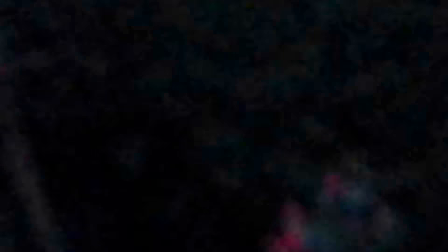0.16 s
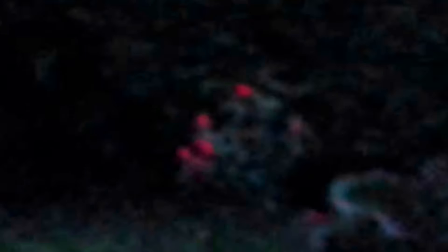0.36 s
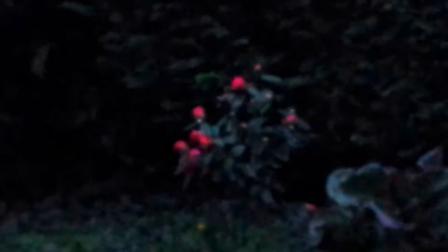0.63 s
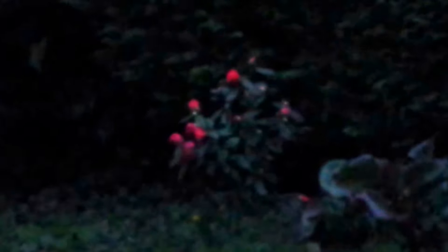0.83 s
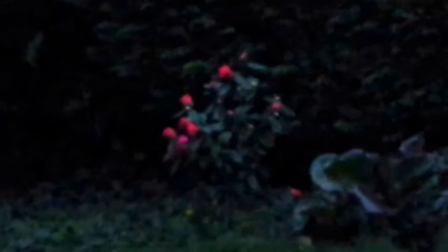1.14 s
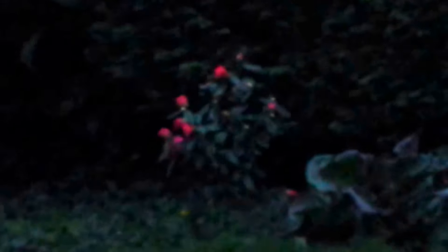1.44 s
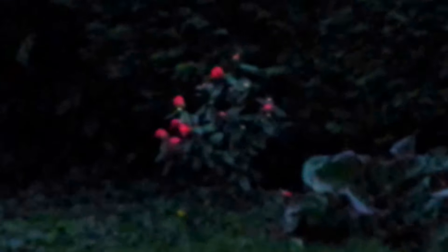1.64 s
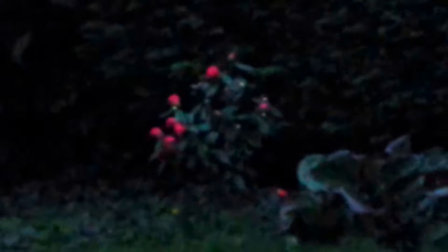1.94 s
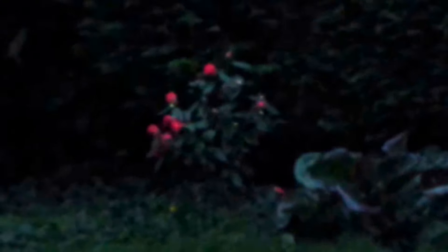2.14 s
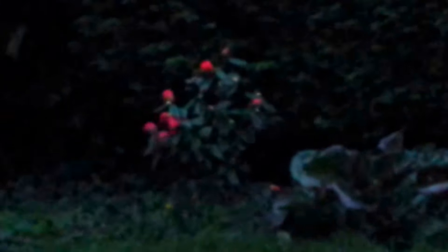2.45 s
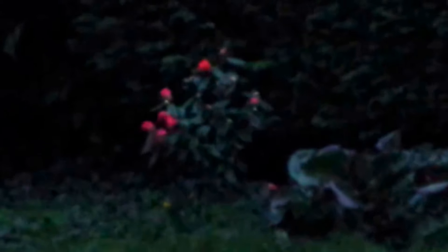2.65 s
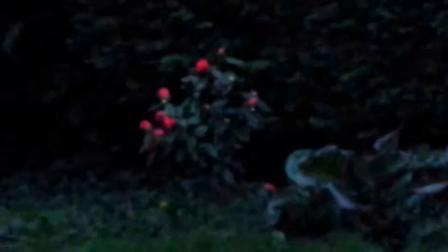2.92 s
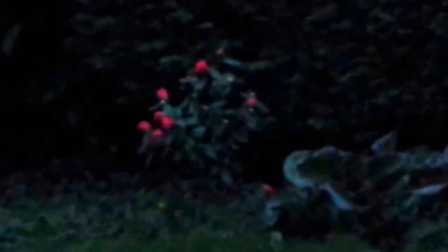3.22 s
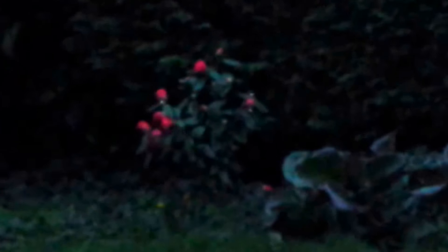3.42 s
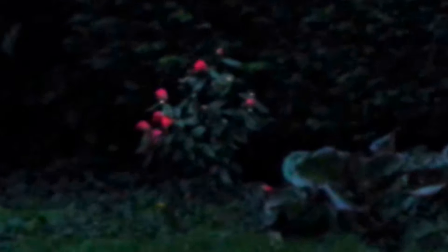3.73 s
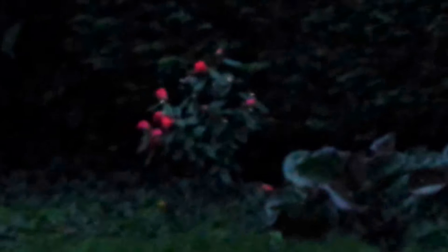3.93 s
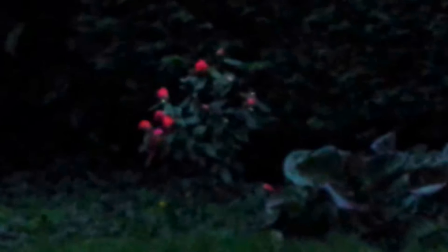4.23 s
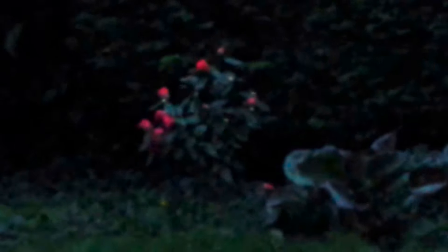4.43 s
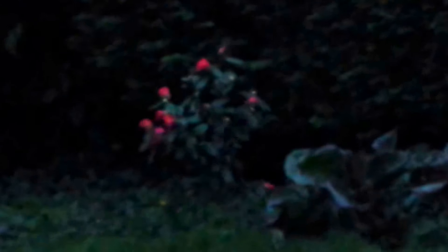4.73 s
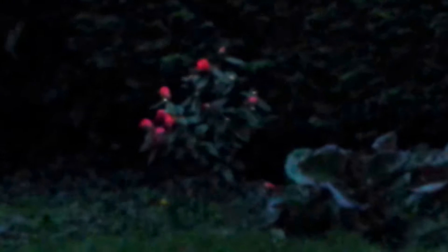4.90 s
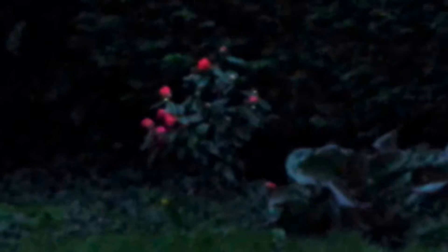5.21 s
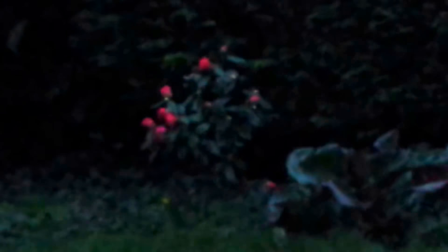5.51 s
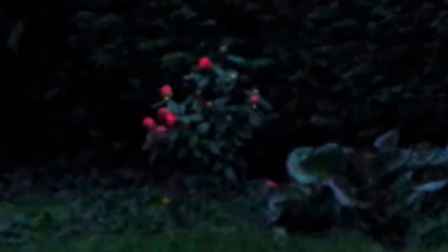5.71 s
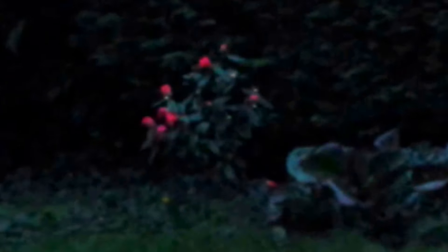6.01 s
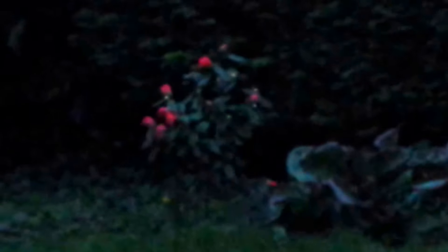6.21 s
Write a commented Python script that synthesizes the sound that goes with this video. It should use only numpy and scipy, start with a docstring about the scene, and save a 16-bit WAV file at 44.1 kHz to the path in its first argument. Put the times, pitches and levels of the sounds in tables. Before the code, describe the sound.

Quiet outdoor air with faint low rumble, hiss and a wavering far machine hum. At about 0.6 s two tiny sharp bill clicks sound, with a barely audible distant call. From 0.9 to 1.25 s a starling gives a raspy trill, a bright warbling trill and quick whistles, then nasal chatter sagging into rattles until 1.65 s. A buzz and whistle lead to two shrill, shivering squeaks at 1.8-1.95 s. After a gap, trills and a steady whistle run from 2.2 to 2.55 s, followed by two very high zips with harsh snaps, a high trill, and thin falling slurs ending near 2.9 s. A long subdued pause follows, with a low rush at 3.6 s and a distant hoarse call at 5.04 s. From 5.45 s whistles, reedy buzzes and warbling trills resume until the end at about 6.36 s, while a low motor hum rises. The bird is slightly right, with short garden echoes.

```python
"""Starling song in a garden

A starling sings in bouts: whistles, trills, nasal chatter, rattles, buzzes, squeaks, very high zips and slurs.
Each note is a sum of harmonics on a gliding pitch plus noise that follows its strength, filtered by the throat;
clicks are noise bursts. Discrete echoes and random reflections stand for ground, leaves and hedge. Behind lie
coloured-noise rumble, wash and hiss, wavering machine tones and two distant short calls made of shaped noise.
The recorder's noise suppressor lowers the quiet passages between the bouts."""
import sys
import numpy as np
from scipy import signal
from scipy.fft import rfft, irfft
from scipy.io import wavfile
from scipy.ndimage import uniform_filter1d

SR = 44100
rng = np.random.default_rng(int(sys.argv[2]) if len(sys.argv) > 2 else 0)


def to_wav(s):
    """Save 16-bit WAV."""
    ch = np.atleast_2d(s).T  # columns
    pcm = np.round(np.clip(ch, -1, 1) * 32767)  # PCM
    wavfile.write(sys.argv[1], SR, pcm.astype(np.int16))


N = 280476
TIME, FREQS = np.arange(N) / SR, np.fft.rfftfreq(N, 1 / SR)  # s, Hz
SOFT_ENDS = signal.windows.tukey(N, .0015)  # short fades before whole-length filtering


def amp(db):
    """Decibel law: 20 dB is a factor of ten in amplitude."""
    return 10 ** (np.asarray(db) / 20)


def evened(x):
    """Normalization to unit root-mean-square amplitude."""
    return x / np.sqrt(np.mean(x ** 2) + 1e-20)


def read(points, hz):
    """Interpolation along a logarithmic frequency axis."""
    f, value = np.transpose(points)
    return np.interp(np.log(hz + 1), np.log(f + 1), value)


def add(mix, start_s, sound):
    """Superposition: a sound adds to the mix from its start time."""
    part = mix[round(start_s * SR):][:len(sound)]
    part += sound[:len(part)]


def wander(size, hz):
    """Low-pass random fluctuation of rms 1, mostly slower than hz."""
    f = np.fft.rfftfreq(size, 1 / SR)
    return evened(irfft(rfft(rng.standard_normal(size)) / (1 + (f / hz) ** 2), size))


# Left-right correlation of diffuse noise: frequency [Hz], correlation [-1 to 1]
NOISE_CORRELATION = [(60, 0.93), (150, 0.87), (380, 0.986), (950, 0.69), (2380, -0.083), (5980, -0.11),
                     (15000, -0.33)]


def noise(spectrum):
    """Diffuse field: coloured noise of rms 1 at two microphones, correlated in the bass."""
    a, b = rfft(rng.standard_normal((2, N)))
    same = np.clip(read(NOISE_CORRELATION, FREQS), -1, 1)
    pair = np.array([a, same * a + np.sqrt(1 - same ** 2) * b])
    return evened(irfft(pair * amp(read(spectrum, FREQS)), N))


# Relative spectra of outdoor rumble, mid-range wash, hiss and low rush: frequency [Hz], density [dB per Hz]
RUMBLE_SPECTRUM = [(15, -49), (25, -16.5), (32, -21), (60, -17.5), (81, -10.5), (102, -11), (120, -8),
                   (167, -8), (291, 1.5), (375, -1), (432, -4), (584, -7), (695, -3), (867, -12),
                   (1100, -25.5), (1430, -40.5), (2420, -120)]
WASH_SPECTRUM = [(700, -21.5), (1000, -3), (1300, 0), (1700, -1), (2300, 0.5), (2800, -10.5), (4500, -10.5),
                 (8000, -16.5)]
HISS_SPECTRUM = [(1760, -33), (3000, 1.5), (3170, 1), (5110, -16), (8640, -7.5), (11800, -2), (13600, 3.5),
                 (15600, -9.5), (16000, -10.5)]
RUSH_SPECTRUM = [(70, -46), (200, -15.5), (300, 1.5), (400, -2), (520, -8), (690, 2.5), (900, -18.5),
                 (1500, -40.5)]
# Swells of low rushing noise: centre_s [s], half_width_s [s, to 1/e], level_db [dB]
RUSH_SWELLS = [(1.151, 0.096, -46), (3.62, 0.13, -47.5)]
RUMBLE_DB, WASH_DB, HISS_DB = -52.5, -58, -61  # rumble and wash at the start; hiss throughout
DRIFT_DB_PER_S = 0.5383  # slow rise of rumble and wash


def background():
    """Broadband ambient noise: rumble and wash rise over a steady hiss, and a low rush swells twice."""
    drift_db = DRIFT_DB_PER_S * TIME
    rumble = amp(RUMBLE_DB + drift_db) * noise(RUMBLE_SPECTRUM)
    wash = amp(WASH_DB + drift_db) * noise(WASH_SPECTRUM)
    hiss = amp(HISS_DB) * noise(HISS_SPECTRUM)
    swells = sum(amp(db) * np.exp(-((TIME - s) / width) ** 2) for s, width, db in RUSH_SWELLS)
    return rumble + wash + hiss + swells * noise(RUSH_SPECTRUM)


def tones(lines, waver_hz):
    """Frequency modulation: sine tones waver independently in pitch by waver_hz rms."""
    total = np.zeros(N)
    for hz, db in lines:
        phase = 2 * np.pi * np.cumsum(hz + waver_hz * wander(N, 3)) / SR
        total += amp(db) * np.sqrt(2) * np.sin(phase)
    return total


# Steady far machinery: pitch_hz [Hz], level_db [dB, before a common lift]
DRONE_LINES = [(140.0, -71), (301.5, -71), (678.3, -75.5), (936.7, -73.5), (1254, -75)]
# Harmonics of a far motor: pitch_hz [Hz], level_db [dB, relative to the motor level]
MOTOR_LINES = [(113, -6), (226, -10.5)]
# Motor level over time: time_s [s], level_db [dB]
MOTOR_LEVEL = [(0, -68.5), (4.7, -71), (5.3, -56), (5.7, -53.5), (6.36, -52)]


def machines():
    """Line spectra: a steady drone and a motor hum whose level follows its own curve."""
    drone = amp(2.5) * tones(DRONE_LINES, waver_hz=2.5)
    motor_level = amp(np.interp(TIME, *np.transpose(MOTOR_LEVEL)))
    return drone + motor_level * tones(MOTOR_LINES, waver_hz=1.5)


# Bill clicks and harsh snaps: start_s [s], level_db [dB, before the high-pass], decay_s [s, to 1/e], edge_hz [Hz]
BILL_CLICKS = [(0.6263, -31.5, 0.00072, 9700), (0.633, -23.5, 0.00085, 10260), (0.935, -47.5, 0.0145, 3587),
               (1.026, -42, 0.0156, 3970), (1.862, -27.5, 0.0152, 8280), (2.581, -25.5, 0.011, 5010),
               (2.626, -24.5, 0.0071, 4973), (5.773, -38, 0.0056, 4000)]


def clicks():
    """Impulsive excitation: exponentially decaying noise bursts, high-passed to the treble."""
    t, out = TIME[:SR // 20], np.zeros(N)
    for start_s, db, decay_s, edge_hz in BILL_CLICKS:
        high_pass = signal.butter(3, edge_hz, "high", fs=SR, output="sos")
        burst = amp(db) * np.exp(-t / decay_s) * rng.standard_normal(len(t))
        add(out, start_s, signal.sosfilt(high_pass, burst))
    return out


# Distant short calls: start_s [s], level_db [dB]
DISTANT_CALLS = [(.68, -59), (5.039, -38.5)]
# Their relative spectrum: frequency [Hz], density [dB per Hz]
DISTANT_SPECTRUM = [(500, -32.5), (950, -21), (1200, -6), (1400, 5.5), (1580, -12), (1800, -12.5),
                    (2900, -30.5), (3450, -24.5), (3750, -13), (4400, -25), (7000, -27.5), (14000, -35)]


def far_calls(rise_s=0.0242, tail_db=-11, tail_t60=1.0):
    """Reverberant decay: a hoarse noise syllable swells and dies, and the gardens echo it."""
    level = np.zeros(N)
    for start_s, db in DISTANT_CALLS:
        elapsed = np.maximum(TIME - start_s, 0)
        u = elapsed / rise_s
        syllable = (u * np.exp(1 - u)) ** 2
        tail = amp(tail_db - 60 * elapsed / tail_t60) * np.tanh(10 * u)
        level += amp(db) * np.hypot(syllable, tail)  # the two add in energy
    return level * noise(DISTANT_SPECTRUM)


BLOOM_S, WARBLE_WANDER = 0.011, 0.016  # time for a warble to widen; random share by which its rate varies
WARBLE_SNAP, JUMP_DIP = 3.5, .55  # abruptness of warble jumps; largest share of strength lost in a jump


def syrinx(tone, hz, db, rasp=0., swing_hz=0., rate_hz=0., *, jitter, throb, second_db):
    """Self-sustained oscillation: a membrane's harmonics glide, warble and tremble; throb lifts warble crests."""
    t = TIME[:len(hz)]
    cycles = np.cumsum(rate_hz * (1 + WARBLE_WANDER * wander(len(t), 87))) / SR
    flip = -np.tanh(WARBLE_SNAP * np.sin(2 * np.pi * cycles))  # lingers at top and bottom
    bloom = np.tanh(t / BLOOM_S)
    tremble = jitter * wander(len(t), 120) + .06 * rasp * wander(len(t), 800)
    pitch = (hz + swing_hz * bloom * flip) * (1 + tremble)
    phase = 2 * np.pi * np.cumsum(pitch) / SR
    tension_db = second_db * np.log2(pitch / 5000)  # a tighter membrane strengthens the second harmonic
    wave = np.zeros(len(t))
    for k, level_db in enumerate(tone, 1):
        audible = k * pitch < SR / 2  # no aliasing
        wave += amp(level_db + (k == 2) * tension_db) * np.sin(k * phase) * audible
    depth = bloom * np.tanh(20 * swing_hz / hz)
    flutter = np.exp(throb * depth * flip + rasp * wander(len(t), 800) / 2)
    jump_loss = 1 - JUMP_DIP * depth * (1 - flip ** 2)
    return amp(db) * evened(wave * flutter * jump_loss)


# Relative spectrum of air rushing through the open bill: frequency [Hz], density [dB per Hz]
BILL_AIR = [(2000, -42.5), (3200, -4.5), (5000, -1.5), (7300, 4.5), (10000, -6), (12500, -3.5), (15500, -2)]


def phrase(notes, gesture, tone, gain_db, noise_db, attack_s, release_s, jitter,
           throb=0., second_db=0., noise_spectrum=BILL_AIR):
    """Envelope following: gated notes of one voice carry coloured noise that follows their strength."""
    out = np.zeros(N)
    for start_s, length_s, *shape in notes:
        t = np.arange(0, length_s, 1 / SR)
        ramp = np.clip(np.minimum(t / attack_s, (length_s - t) / release_s), 0, 1)
        gate = np.sin(np.pi / 2 * ramp) ** 2
        note = syrinx(tone, *gesture(t, *shape), jitter=jitter, throb=throb, second_db=second_db)
        add(out, start_s, gate * note)
    strength = np.sqrt(abs(uniform_filter1d(out ** 2, size=160)))
    return amp(gain_db) * (out + amp(noise_db) * strength * noise(noise_spectrum)[0])


def arch(t, turn_s, first_hz, turn_hz, last_hz, bend=1.6):
    """Power-law glide: pitch eases into a turning point and curves away (bend 2 is a parabola)."""
    before = np.maximum(1 - t / turn_s, 0)
    after = np.maximum(t - turn_s, 0) / max(t[-1] - turn_s, 1 / SR)
    return turn_hz + (first_hz - turn_hz) * before ** bend + (last_hz - turn_hz) * after ** bend


def swell(t, db, swell_db):
    """Exponential envelope: level changes linearly in decibels through a note."""
    return db + swell_db * (t / t[-1] - .5)


def arched(t, turn_s, first_hz, turn_hz, last_hz, db, swell_db, *texture):
    """Combined modulation: one arch of pitch under one swell, with any rasp and warble."""
    return arch(t, turn_s, first_hz, turn_hz, last_hz), swell(t, db, swell_db), *texture


# In all note tables below, level_db is relative: each voice has its own gain.
# Trills: start_s [s], length_s [s], turn_s [s after start], first_hz, turn_hz, last_hz [Hz],
# level_db [dB], swell_db [dB], rasp [0-1], warble_swing_hz [Hz], warble_rate_hz [Hz]
TRILL_NOTES = [ (.927, .041, .014, 4650, 4480, 4240, -39, 12, .75, 220, 130),
               (1.069, 0.0773, 0.0506, 5268, 6366, 5228, -15, 6.5, 0, 372.3, 93.81),
               (2.179, 0.0983, .050, 4215, 4371, 4106, -26, 9.5, 0.2, 245, 53.45),
               (2.439, 0.02584, .011, 3450, 3627, 3630, -21, 2.5, 0.07, 20, 130),
               (2.457, .051, 0.023, 3391, 3253, 3490, -23, -12, 0.3, 170, 120),
               (2.504, 0.0387, 0.03024, 3655, 3795, 3641, -21.5, -8.5, 0.1, 120, 108),
               (2.666, 0.0566, 0.042, 7724, 8562, 8240, -17, 10.5, 0.19, 140, 107),
               (5.627, 0.0591, 0.0238, 6100, 6826, 6993, -32.5, -22.5, 0, 150, 109),
               (5.876, 0.08285, 0.0306, 5061, 5296, 5123, -14.5, 8, 0.05, 256.5, 62.02),
               (6.183, .084, 0.057, 5245, 5280, 5265, -13, 4.5, 0, 243.7, 63.54)]
# Strength of harmonics 1, 2, 3 ..: level_db [dB]
TRILL_HARMONICS = [0.5, -27.5, -29, -26.5]


def trills():
    """Frequency and amplitude modulation: pitch flips fast between two values, stronger at the upper."""
    return phrase(TRILL_NOTES, arched, TRILL_HARMONICS, gain_db=-2.5, noise_db=-36,
                  attack_s=0.014, release_s=.009, jitter=.005, throb=.55, second_db=15.5)


# Pure whistles: start_s [s], length_s [s], turn_s [s after start], first_hz, turn_hz, last_hz [Hz],
# level_db [dB], swell_db [dB]
WHISTLE_NOTES = [ (.960, 0.0262, 0.0175, 3672, 4544, 4043, -30.5, 9),
                 (1.024, 0.04377, 0.0085, 4085, 4312, 3699, -30, 5.5),
                 (1.145, .040, 0.0233, 4750, 4143, 4230, -25.5, -9),
                 (1.192, 0.017, .010, 4200, 4111, 4160, -22, -7),
                 (1.216, .013, .007, 4330, 4350, 4330, -23, -24),
                 (1.654, 0.05631, 0.044, 4420, 4597, 4376, -21.5, -3.5),
                 (2.311, 0.0754, 0.00945, 4671, 4702, 4542, -24, 14.5),
                 (2.400, 0.01035, 0.007, 4570, 4455, 4392, -25, 3),
                 (5.465, 0.02845, .031, 3880, 4460, 4450, -37, 15),
                 (5.502, 0.018, 0.01097, 5130, 5860, 3830, -26.5, 9),
                 (5.519, 0.0151, 0.0076, 4295, 3711, 3770, -28.5, -11),
                 (5.955, 0.013, .007, 4950, 4550, 4500, -30, -6),
                 (5.988, 0.0508, .017, 3084, 3650, 2988, -27.5, 14),
                 (6.294, 0.0529, 0.0141, 2915, 3630, 3253, -28.5, 13)]
# Strength of harmonics 1, 2, 3 ..: level_db [dB]
WHISTLE_HARMONICS = [-1.5, -28, -30.5, -29]


def whistles():
    """Near-sinusoidal oscillation: the fundamental dominates its weak harmonics."""
    return phrase(WHISTLE_NOTES, arched, WHISTLE_HARMONICS, gain_db=1, noise_db=-28.5,
                  attack_s=0.004, release_s=0.0023, jitter=.005)


def chatter_note(t, *shape):
    """Light random modulation: an arched pitch with a slight rasp."""
    return *arched(t, *shape), .12


# Nasal chatter: start_s [s], length_s [s], turn_s [s after start], first_hz, turn_hz, last_hz [Hz],
# level_db [dB], swell_db [dB]
CHATTER_NOTES = [ (1.265, 0.0549, .021, 1773, 2109, 1654, -24, -3),
                 (1.374, .056, 0.0417, 1810, 2000, 1770, -27, 6),
                 (1.511, .050, .021, 1796, 2046, 1616, -25.5, 2.5)]
# Strength of harmonics 1, 2, 3 .. in chatter and rattles: level_db [dB]
CHATTER_HARMONICS = [-22, 0, 5.5, -10, -9.5, -13.5, -21, -29, -21.5, -22]


def chatter():
    """Harmonic-rich oscillation: low notes whose second and third harmonics outweigh the fundamental."""
    return phrase(CHATTER_NOTES, chatter_note, CHATTER_HARMONICS, gain_db=-0.5, noise_db=-19.5,
                  attack_s=0.0083, release_s=0.01067, jitter=0.003948)


def rattle_note(t, db):
    """Reduced tension: the slack membrane dips in pitch and flaps."""
    hz = 1435 * arch(t, t[-1] / 2, 1.08, 0.9507, 1.08)  # ratios at start, middle and end
    rasp, swing_hz, rate_hz = .4, 90, 93
    return hz, db, rasp, swing_hz, rate_hz


# Rattles into which the chatter sags: start_s [s], length_s [s], level_db [dB]
RATTLE_NOTES = [(1.308, .068, -27), (1.553, .080, -27.5)]


def rattles():
    """Flapping modulation: the chatter's harmonics throb with a fast warble."""
    return phrase(RATTLE_NOTES, rattle_note, CHATTER_HARMONICS, gain_db=1, noise_db=-22,
                  attack_s=0.00608, release_s=.006, jitter=0.0054, throb=.9)


# Reedy buzzes: start_s [s], length_s [s], turn_s [s after start], first_hz, turn_hz, last_hz [Hz],
# level_db [dB], swell_db [dB], rasp [0-1], warble_swing_hz [Hz], warble_rate_hz [Hz]
BUZZ_NOTES = [ (1.626, .032, .030, 1860, 2136, 2230, -27, 6.5, .2, 6.41, 93),
              (5.629, .093, .030, 2100, 2203, 2110, -31.5, 13, 0.22, 72.3, 117.3),
              (5.717, .062, 0.058, 2173, 2025, 1968, -28, 3, 0.13, 19.5, 780),
              (6.045, .070, .020, 1700, 2151, 1779, -24.5, -2, 0.1, 3.8, 99),
              (6.346, .022, .017, 1600, 1936, 2070, -24, 21.5, 0.98, 5, 95)]
# Strength of harmonics 1, 2, 3 ..: level_db [dB]
BUZZ_HARMONICS = [-33.5, 4.5, -16, -21.5, -27, -26.5, -28, -9.5]


def buzzes():
    """Harmonic dominance: the second harmonic leads, roughened by rasp and warble."""
    return phrase(BUZZ_NOTES, arched, BUZZ_HARMONICS, gain_db=3.0, noise_db=-20.5,
                  attack_s=0.0063, release_s=.007, jitter=.0023, throb=.9)


def squeak_note(t, first_hz, held_hz, db, rasp):
    """Exponential approach: a quick scoop up to a pitch that creeps higher and shivers."""
    scoop = (first_hz - held_hz) * np.exp(-t / .004)
    hz = held_hz + scoop + 820 * t  # climbs 820 Hz per second
    shiver_hz, shiver_rate_hz = 83.6, 100
    return hz, swell(t, db, 6.5), rasp, shiver_hz, shiver_rate_hz


# Shrill squeaks: start_s [s], length_s [s], first_hz [Hz], held_hz [Hz, before the climb],
# level_db [dB], rasp [0-1]
SQUEAK_NOTES = [(1.800, .072, 4848, 5692, -23, .25), (1.887, .057, 5416, 6027, -21.5, 0)]
# Strength of harmonics 1, 2: level_db [dB]
SQUEAK_HARMONICS = [-1.5, 3]
# Relative spectrum of the rough noisy sidebands around a squeak's harmonics: frequency [Hz], density [dB per Hz]
SQUEAK_HAZE = [(3500, -36), (5400, -1.5), (6400, -5), (7400, -36.5), (9300, -1), (10500, 7), (12800, -9.5),
               (14500, -3.5), (16000, -8)]


def squeaks():
    """Strong second harmonic: shivering notes throb deeply amid rough noisy sidebands."""
    return phrase(SQUEAK_NOTES, squeak_note, SQUEAK_HARMONICS, gain_db=0, noise_db=-10.5,
                  attack_s=0.0083, release_s=0.0081, jitter=0.0024, throb=1.7, noise_spectrum=SQUEAK_HAZE)


def zip_note(t, top_hz, db, rasp=0.17):
    """Up-down chirp: a steep arch that is loud only near its top."""
    turn_s, foot_hz = 0.016, 4500
    flank = 1 - np.exp(-((t - turn_s) / .003) ** 2 / 2)
    return arch(t, turn_s, foot_hz, top_hz, foot_hz, bend=3), db - 18 * flank, rasp


# Zips that shoot up and straight down again: start_s [s], length_s [s], top_hz [Hz], level_db [dB]
ZIP_NOTES = [(2.564, .023, 12360, -12.5), (2.609, 0.02, 12440, -15)]
# Strength of harmonics 1, 2 in zips and slurs: level_db [dB]
ZIP_HARMONICS = [-6.5, -17]


def zips():
    """Rapid frequency sweep: each zip is a very short, high chirp."""
    return phrase(ZIP_NOTES, zip_note, ZIP_HARMONICS, gain_db=5, noise_db=-28,
                  attack_s=0.0027, release_s=.002, jitter=0.005253)


def slur_note(t, first_hz, last_hz, db, rasp=0.095):
    """Piecewise-linear glide: pitch sags steadily as the note swells, then plunges."""
    sag = first_hz - 32000 * t  # falls 32000 Hz per second
    plunge = np.maximum(1 - (t[-1] - t) / 0.012, 0)  # over the last 12 ms
    return sag + (last_hz - sag[-1]) * plunge, swell(t, db, 19), rasp


# Very high slurs: start_s [s], length_s [s], first_hz [Hz], last_hz [Hz], level_db [dB]
SLUR_NOTES = [(2.762, .046, 15890, 10770, -30), (2.836, .047, 16310, 11220, -31)]


def slurs():
    """Downward frequency sweep: very high notes with the harmonics of a zip."""
    return phrase(SLUR_NOTES, slur_note, ZIP_HARMONICS, gain_db=2, noise_db=-36.0,
                  attack_s=0.0069, release_s=0.0061, jitter=0.006)


# Colour that windpipe and bill give every note: frequency [Hz], gain [dB]
THROAT_RESPONSE = [(2300, -9.5), (2850, -25.5), (3150, -4.5), (4500, 1.5), (6600, -5.5), (7600, -12.5),
                   (9000, -1.5), (12000, -3.5), (16000, 6)]


def starling():
    """Source and filter: the throat's response colours the sum of all voices."""
    song = trills() + whistles() + chatter() + rattles() + buzzes() + squeaks() + zips() + slurs()
    return irfft(rfft(song * SOFT_ENDS) * amp(read(THROAT_RESPONSE, FREQS)), N)


def scatter(x, delay_s, t60):
    """Diffuse scattering: sparse random-sign reflections differ by microphone and decay by frequency."""
    t = TIME[:SR // 2]
    arrivals = rng.random((2, len(t))) < 4000 / SR  # about 4000 per second
    taps = rng.standard_normal((2, len(t))) * arrivals * (t > delay_s)
    hz, s, z = signal.stft(taps, SR, nperseg=128)
    decay = amp(-60 * s / read(t60, hz)[:, None])
    tail = signal.istft(z * decay, SR, nperseg=128)[1]
    tail = tail / np.linalg.norm(tail, axis=1, keepdims=True)
    return signal.fftconvolve(x[None], tail, axes=1)[:, :N]


# First echoes off the ground and nearby things, per microphone: delay_ms [ms], level_db [dB]
LEFT_REFLECTIONS = [(.7, -21.5), (2.1, -20.5), (3.5, -3.5), (6.9, -4)]
RIGHT_REFLECTIONS = [(1.7, -22.5), (3.6, -15.5), (5.4, -13)]
# Decay times of near leaves and far hedge: frequency [Hz], time to fall 60 dB [s]
LEAF_DECAY = [(3000, 0.071), (6000, 0.19), (12000, 0.062)]
HEDGE_DECAY = [(3000, .38), (6000, 0.3), (12000, 0.28)]
# The bird's stereo balance: frequency [Hz], left minus right [dB]
BIRD_BALANCE = [(3000, -9), (4500, -3.5), (6000, -5.5), (8500, -5), (12000, -14.5), (16000, -15)]


def garden(x, lead_s=0.00015965):
    """Arrival-time and level differences: sound leads at left; ground, near leaves and far hedge answer."""
    def late(seconds):
        return np.interp(TIME - round(seconds * SR) / SR, TIME, x)
    left = x + sum(amp(db) * late(ms / 1000) for ms, db in LEFT_REFLECTIONS)
    right = late(lead_s) + sum(amp(db) * late(lead_s + ms / 1000) for ms, db in RIGHT_REFLECTIONS)
    leaves = amp(-13) * scatter(x, delay_s=0.0031, t60=LEAF_DECAY)
    hedge = amp(-15.5) * scatter(x, delay_s=0.019, t60=HEDGE_DECAY)
    heard = np.array([left, right]) + leaves + hedge
    sides = amp(np.outer([.5, -.5], read(BIRD_BALANCE, FREQS)))
    sides = sides / np.sqrt(np.mean(sides ** 2, 0))  # keeps the two sides' mean power gain at one
    return irfft(rfft(heard * SOFT_ENDS) * sides, N)


def scene():
    """Superposition: the bird in its garden, the ambient noise and the distant calls add."""
    ambience = (background() + machines()) * amp([[-.6], [.6]])  # dB at left and right
    return ambience + garden(clicks() + starling()) + far_calls()


OPEN_DB, OPEN_RANGE_DB = -47.5, 4.5  # level where the suppressor starts to open; range to fully open
SHUT_DB, OPEN_S = -7, 0.098  # gain when shut; smoothing time of the opening


def record(dry):
    """Downward expansion: a noise suppressor turns the pauses down; then a low-pass limits the band."""
    power_db = 10 * np.log10(abs(uniform_filter1d((dry ** 2).mean(0), size=2048)) + 1e-12)
    wanted = np.clip((power_db - OPEN_DB) / OPEN_RANGE_DB, 0, 1)
    opened = uniform_filter1d(wanted, round(OPEN_S * SR))
    gated = dry * amp(SHUT_DB * (1 - opened))
    low_pass = signal.firwin(511, 15950, window=("kaiser", 9), fs=SR)  # edge in Hz
    return signal.oaconvolve(gated, low_pass[None], "same")


dry = scene()
out = record(dry)
to_wav(out)
```